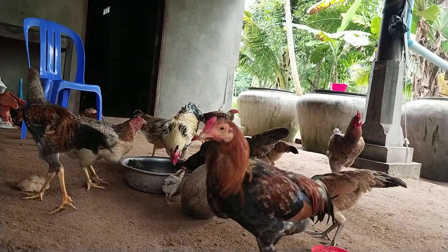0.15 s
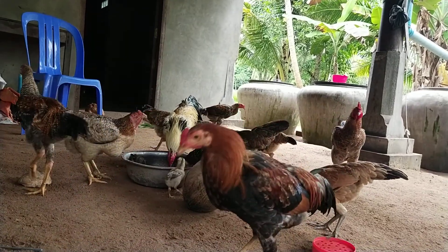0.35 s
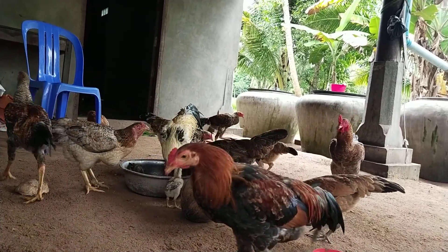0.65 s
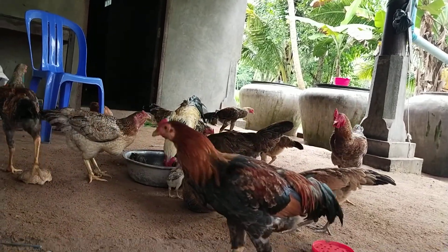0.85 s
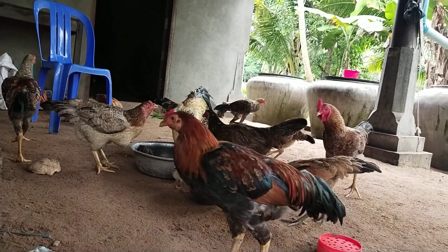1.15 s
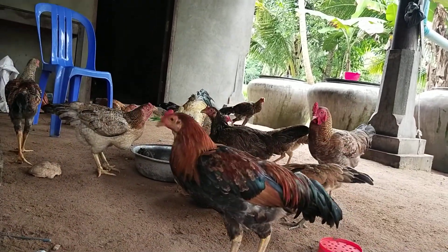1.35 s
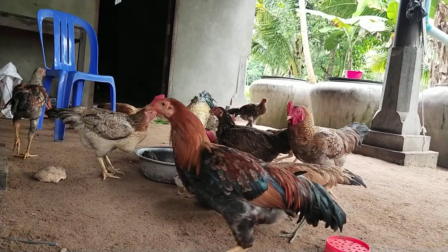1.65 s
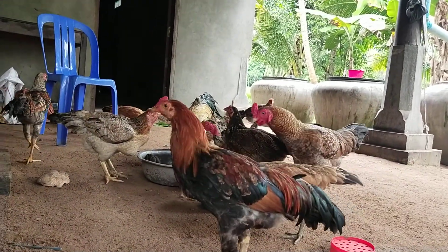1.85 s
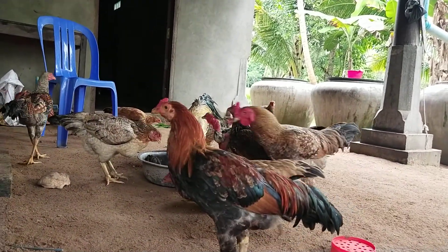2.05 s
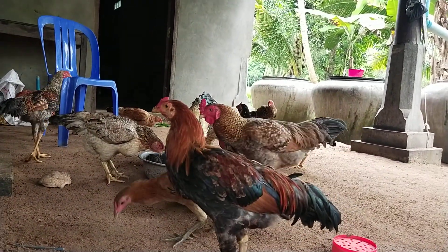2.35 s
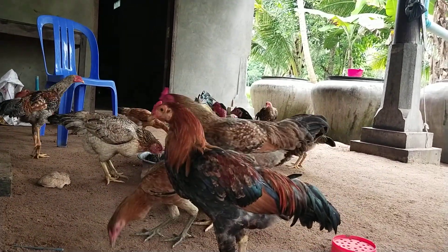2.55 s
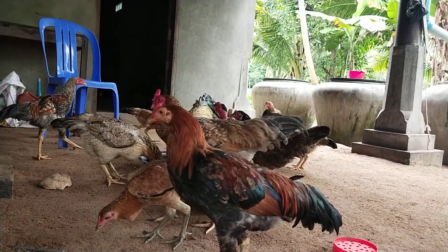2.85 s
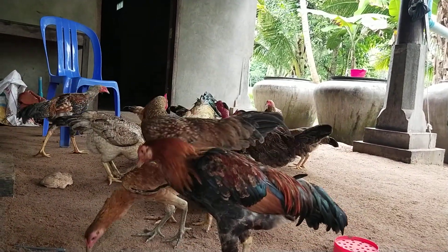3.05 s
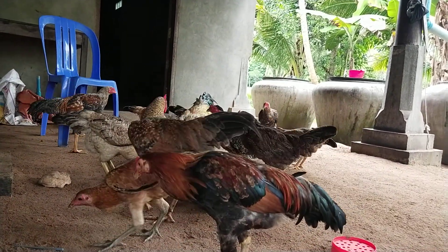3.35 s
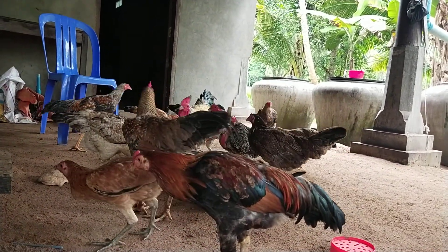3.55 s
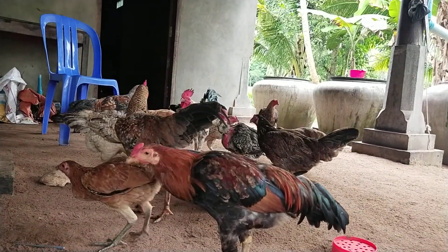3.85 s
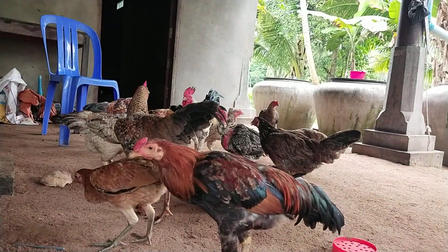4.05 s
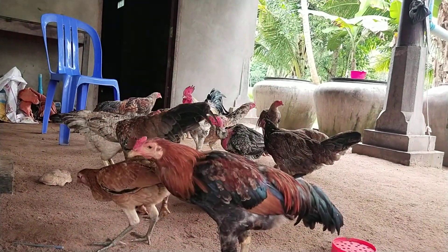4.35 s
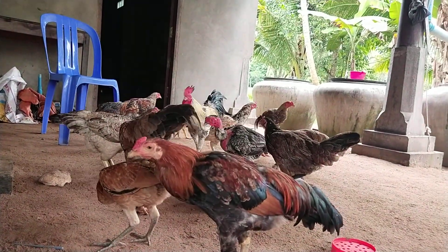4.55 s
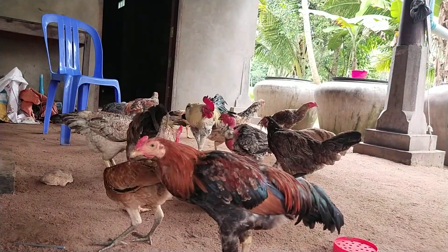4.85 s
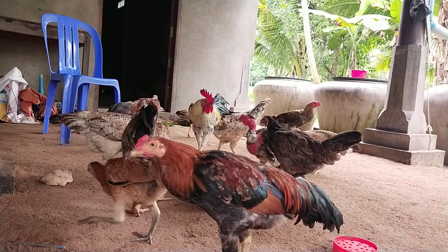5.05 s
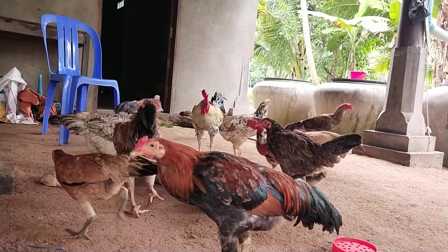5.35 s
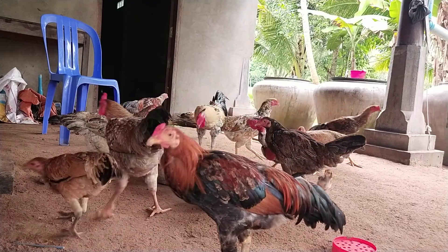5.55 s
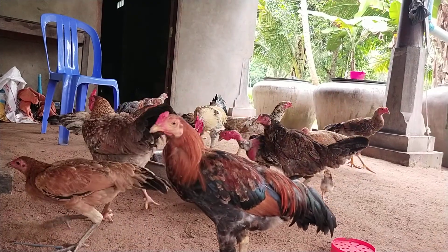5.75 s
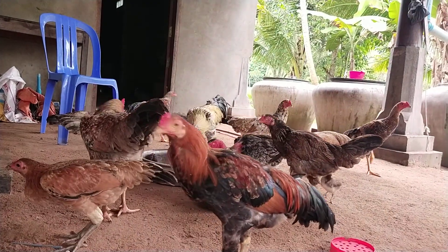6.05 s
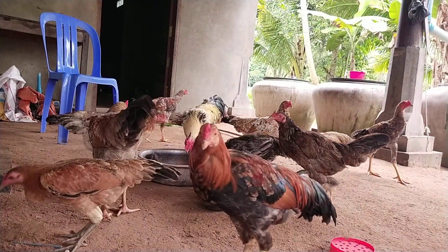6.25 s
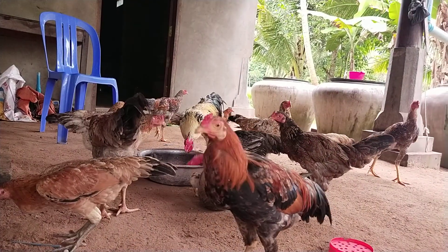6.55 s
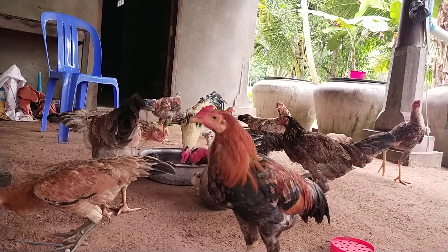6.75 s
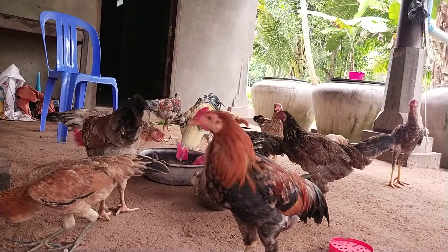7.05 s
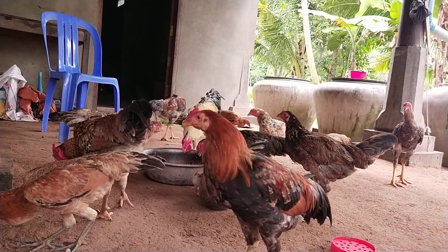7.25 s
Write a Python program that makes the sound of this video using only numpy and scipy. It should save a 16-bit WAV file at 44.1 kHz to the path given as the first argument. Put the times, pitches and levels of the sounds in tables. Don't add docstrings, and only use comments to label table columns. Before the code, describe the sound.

Hens cluck, coo and whistle softly around a metal feed basin while small chicks peep rapidly and beaks tap, in a hard-walled yard.

```python
import sys
import numpy as np
from scipy import signal
from scipy.fft import rfft, irfft, next_fast_len
from scipy.io import wavfile
from scipy.ndimage import uniform_filter1d

SR = 44100
rng = np.random.default_rng(int(sys.argv[2]) if len(sys.argv) > 2 else 0)


def makeup_ratio(level_db):
    decades = np.asarray(level_db, float) / 20
    return 10 ** decades


def waveform_to_disk(signal):
    frames = np.transpose(np.atleast_2d(signal))
    scaled = np.clip(frames, -1, 1) * 32767
    samples = np.round(scaled).astype(np.int16)
    wavfile.write(sys.argv[1], SR, samples)


N = 325899


def rms_one(x):
    return x / np.sqrt(np.mean(x ** 2) + 1e-20)


def band(x, low_hz, high_hz, order=2):
    return signal.sosfilt(signal.butter(order, [low_hz, high_hz], "band", fs=SR, output="sos"), x)


def drift(size, rate):
    knots = rng.standard_normal(max(300, int(size * 400 / SR) + 3))
    return np.interp(np.arange(size) * min(rate, 400) / SR, np.arange(len(knots)), knots)


def add(out, sound, start_s, pan_db):
    for side, sign in ((0, 1), (1, -1)):
        at = round(start_s * SR) + max(0, round(sign * pan_db * 1.5))
        part = sound[:N - at]
        out[side, at:at + len(part)] += makeup_ratio(sign * pan_db / 2) * part


def note(s, length, start_hz, end_hz, level_db, swell_db, arch=0):
    u = np.linspace(0, 1, num=9)
    pitch = start_hz + (end_hz - start_hz) * u + 4 * arch * start_hz * u * (1 - u)
    return np.c_[s + length * u, pitch, level_db + swell_db * u]


def sing(rows, partials_db, jitter, shimmer_db, edge_s):
    s, hz, level_db = np.transpose(rows)
    t = s[0] + np.arange(round((s[-1] - s[0]) * SR) + 400) / SR
    pitch = np.interp(t, s, hz) * (1 + jitter * drift(len(t), 257.8))
    phase = 2 * np.pi * np.cumsum(pitch) / SR
    wave = 0
    for k, db in enumerate(partials_db, 1):
        wave = wave + makeup_ratio(db + shimmer_db * drift(len(t), 110.0)) * np.sin(k * phase)
    edges = np.clip(np.minimum(t - t[0], t[-1] - t) / max(edge_s, 1e-3), 0, 1)
    return np.sqrt(2) * wave * makeup_ratio(np.interp(t, s, level_db)) * edges ** 2


def yard():
    # f/Hz, level per Hz/dB
    yard_colour = [(55, -9), (108, -2), (369, -20), (2300, -28), (3400, -26), (4700, -21), (5700, -31),
                   (6400, -16.5), (7300, -19.5), (8900, -20.5), (9700, -28), (10700, -19), (11600, -29),
                   (12200, -38), (13300, -41), (14600, -39)]
    size = next_fast_len(N)
    table_hz, table_db = np.transpose(yard_colour)
    hz = np.arange(1, size // 2 + 2) * SR / size
    alike = .95 / (1 + (hz / 1500) ** 1.4)
    colour = makeup_ratio(np.interp(np.log(hz), np.log(table_hz), table_db, left=-32, right=-44))
    colour = colour * np.sqrt([1 + alike, 1 - alike])
    mid, side = irfft(rfft(rng.standard_normal((2, size))) * colour, size)[:, :N]
    out, edges = 0, 25 * 2 ** np.arange(0, 9.5, .3)
    for low, high in zip(edges, edges[1:]):
        patches = makeup_ratio(2 * drift(N, 12) + 1.2 * drift(N, 3))
        out = out + patches * band([mid + side, mid - side], low, high)
    return makeup_ratio(-60) * rms_one(out)


def far_chicks():
    # t/s, start f/Hz, level/dB
    far_peeps = [(0.0, 7250, -87), (0.278, 7570, -69), (0.5, 7640, -62.5), (0.799, 7600, -64),
                 (1.102, 7610, -68), (1.31, 7420, -67.5), (1.448, 7600, -71), (2.43, 7440, -65),
                 (2.581, 7800, -65), (2.928, 7720, -66), (3.068, 7700, -67), (3.491, 7960, -65),
                 (3.768, 8190, -69.5), (4.049, 8040, -65), (4.308, 7960, -60.5), (4.529, 7010, -66.5),
                 (4.988, 7630, -72), (5.329, 7625, -65.5), (5.598, 7150, -64), (5.878, 7220, -70.5),
                 (6.18, 7330, -67), (6.358, 7730, -67), (6.529, 7520, -61), (6.628, 7430, -66.5),
                 (6.769, 6940, -62), (6.878, 7400, -67), (7.03, 7320, -70)]
    out = np.zeros((2, N))
    brood = rng.uniform((0, 3300, -87), (N / SR - .1, 4200, -76), (140, 3))
    brood[::2, 1] *= 2
    for s, start_hz, level_db in [*far_peeps, *brood]:
        rows = [(s, start_hz, level_db), (s + .095, start_hz * .85, level_db - 6.5)]
        add(out, sing(rows, [0], jitter=.015, shimmer_db=3, edge_s=.015), s, pan_db=-7)
    return out


def scuffles():
    # t/s, length/s, thump level/dB, feather hiss level/dB, lowest thump f/Hz
    bursts = [(0.556, 0.067, -62, -95, 120), (0.789, 0.32, -64, -101, 176), (0.976, 0.21, -62, -85, 180),
              (2.307, 0.121, -63.5, -77, 184), (3.032, 0.077, -63.5, -77, 300),
              (3.07, 0.063, -85, -69, 300), (3.41, 0.049, -57, -90, 397), (2.002, .3, -67.5, -92, 900),
              (4.75, 0.027, -63, -62.5, 300), (5.546, 0.13, -76, -76, 300), (5.307, 0.18, -58, -78, 1000),
              (5.535, 0.19, -62.5, -68, 700), (6.296, 0.12, -65, -73, 180)]
    out = np.zeros((2, N))
    for s, length, thump_db, hiss_db, low_hz in bursts:
        size = round(length * SR)
        lumps = makeup_ratio(5.5 * drift(SR // 3, 90))[:size]
        noise = rng.standard_normal((2, SR // 3))[:, :size] * lumps
        thump = makeup_ratio(thump_db) * rms_one(band(noise[0], low_hz, 2300 + 2 * low_hz))
        hiss = makeup_ratio(hiss_db) * rms_one(band(noise[1], 3300, 15000))
        add(out, (thump + hiss) * signal.windows.tukey(size, .3), s, pan_db=4.0)
    return out


def knocks(blows, bounce_s):
    contact_s, ring_hz, crack_db = .00068, 2600, -9
    out, t = np.zeros((2, N)), np.arange(400) / SR
    contact = t / contact_s * np.exp(1 - t / contact_s)
    crack = makeup_ratio(crack_db) * np.sin(2 * np.pi * ring_hz * t) * np.exp(-t / 0.00065)
    for s, peak_db, body_hz, bounce_hz, bounce_db in blows:
        body = contact * np.sin(2 * np.pi * body_hz * t)
        rebound = contact * np.sin(2 * np.pi * bounce_hz * t)
        add(out, makeup_ratio(peak_db) * (crack - body), s + .001, pan_db=3)
        add(out, makeup_ratio(peak_db + bounce_db) * rebound, s + bounce_s, pan_db=3)
    return out


def chicks():
    # t/s, length/s, start f/Hz, end f/Hz, level/dB
    fading_peeps = [(0.0, 0.035, 4020, 3160, -47), (.1, 0.11, 3320, 3170, -51),
                    (.29, 0.045, 3380, 2850, -46.5), (.77, 0.048, 4470, 3690, -46),
                    (.94, 0.1, 3100, 2640, -61), (1.19, 0.055, 3350, 2820, -49.5),
                    (1.56, 0.091, 4574, 3660, -50.5), (1.89, 0.18, 3700, 2800, -48.5),
                    (2.06, 0.049, 3700, 2810, -39), (2.11, 0.083, 5770, 4620, -46),
                    (2.7, 0.05, 4280, 3250, -42), (2.85, 0.035, 4380, 3630, -36),
                    (3.06, 0.039, 4180, 3450, -41.5), (3.17, 0.065, 6800, 5980, -48),
                    (3.49, 0.089, 3560, 2626, -45.5), (3.63, 0.046, 4100, 3300, -40),
                    (3.76, .04, 4420, 3980, -49), (4.03, 0.045, 4150, 3860, -56),
                    (2.28, 0.038, 4120, 3510, -45), (4.31, 0.031, 4120, 3640, -40.5),
                    (4.37, 0.053, 2650, 2940, -47), (4.98, 0.05, 4150, 3160, -39.5),
                    (5.59, 0.098, 3480, 3150, -42), (5.84, 0.046, 2685, 3150, -46)]
    held_peeps = [(1.265, 0.056, 4250, 4020, -55.5), (1.3, 0.067, 3900, 2800, -53.5),
                  (1.3, 0.11, 4770, 4450, -52.5), (2.27, 0.047, 5930, 4820, -48.5),
                  (2.31, 0.16, 7340, 7110, -55.5), (3.13, 0.12, 3620, 2786, -53),
                  (3.33, 0.25, 7070, 7020, -58), (3.8, 0.026, 4560, 3470, -49.5),
                  (4.36, 0.074, 5340, 5580, -62.5), (1.7, 0.028, 3120, 2710, -50.5),
                  (2.43, 0.034, 6600, 6150, -54), (4.52, 0.065, 3590, 2720, -50),
                  (4.84, 0.028, 4000, 3270, -52), (4.865, 0.044, 3230, 2760, -49),
                  (5.83, 0.071, 4300, 3490, -63), (6.15, 0.047, 3810, 2980, -53),
                  (6.86, 0.066, 3220, 3520, -54.5), (6.98, 0.063, 3435, 3207, -50),
                  (7.02, 0.031, 5000, 4150, -54), (6.48, 0.061, 4800, 5760, -57),
                  (7.02, 0.064, 3070, 2570, -60), (7.28, 0.087, 4300, 3310, -60)]
    drooping_peeps = [(1.43, 0.067, 4030, 3980, -50.5), (1.5, 0.018, 3990, 2570, -41),
                      (6.75, 0.097, 3385, 2730, -50), (1.5, 0.069, 5370, 4910, -50),
                      (2.08, 0.15, 3880, 2780, -50), (5.19, 0.055, 4300, 4400, -49.5)]
    hooked_peeps = [(.69, 0.048, 4560, 4530, -49), (4.49, 0.035, 3000, 3470, -60)]
    # t/s, f/Hz, level/dB
    bent_peeps = [
        [(1.632, 5010, -59), (1.65, 5660, -45), (1.69, 5290, -42), (1.715, 4340, -46)],
        [(4.095, 5480, -57), (4.14, 5380, -48.5), (4.2, 4590, -46), (4.235, 4310, -41), (4.262, 2985, -45.5),
         (4.295, 2530, -52.5)],
        [(4.12, 4523, -47), (4.145, 4330, -43.5), (4.16, 3600, -45), (4.19, 3350, -56)],
        [(.475, 3600, -43), (.5, 3186, -59), (.55, 2870, -71), (.62, 2900, -52)],
        [(.53, 4350, -56), (.555, 4420, -54), (.58, 3980, -50), (.605, 3540, -50)],
        [(3.22, 5560, -60), (3.26, 5370, -49), (3.295, 5000, -47), (3.32, 4240, -49)],
        [(3.33, 4150, -48), (3.365, 3740, -50.5), (3.38, 3300, -53), (3.42, 2870, -56)],
        [(3.465, 5630, -49), (3.49, 5880, -46), (3.53, 5260, -41), (3.545, 4070, -44)],
        [(5.265, 4100, -45.5), (5.36, 3886, -44.5), (5.385, 3350, -44), (5.44, 3260, -52), (5.51, 3080, -57)],
        [(5.475, 4710, -48), (5.49, 5477, -46), (5.52, 5620, -45), (5.548, 4940, -32), (5.56, 4000, -47),
         (5.58, 3000, -47), (5.6, 2810, -54)],
        [(6.165, 5190, -42), (6.21, 4630, -44.5), (6.27, 4510, -45), (6.34, 4390, -43.5), (6.37, 3700, -46.5),
         (6.405, 2510, -46.5)],
        [(6.47, 2580, -48.5), (6.515, 3620, -48.5), (6.53, 4300, -43)],
        [(2.325, 3500, -43), (2.37, 3784, -50), (2.43, 3640, -47.5), (2.46, 2870, -51.5)],
        [(6.57, 5800, -33), (6.605, 4620, -38), (6.63, 3780, -43), (6.665, 2650, -44)],
    ]
    # t/s, f/Hz, level/dB
    swelling_peeps = [
        [(1.05, 3400, -62), (1.085, 3020, -43.5), (1.134, 2774, -46)],
        [(4.65, 4170, -56), (4.7, 3995, -45), (4.726, 3320, -49), (4.765, 2730, -53)],
        [(6.62, 7830, -50), (6.645, 6300, -45), (6.665, 5300, -52)],
        [(6.36, 7400, -54), (6.39, 5300, -55)],
    ]
    kinds = [(fading_peeps, -11.5, -0.018), (held_peeps, 3.8, 0.0106),
             (drooping_peeps, 3.2, .08), (hooked_peeps, -2.2, 0.17)]
    peeps = [note(*row, swell_db, arch) for kind, swell_db, arch in kinds for row in kind]
    out, octave_db = np.zeros((2, N)), -23.5
    for rows in peeps + bent_peeps + swelling_peeps:
        peep = sing(rows, [0, octave_db], jitter=.007, shimmer_db=2, edge_s=.011)
        add(out, peep, rows[0][0], pan_db=rng.normal(1, 2))
    return makeup_ratio(-2.5) * out


def hens():
    # t/s, length/s, start f/Hz, end f/Hz, fundamental level/dB
    murmurs = [(.82, 0.24, 475.4, 467, -59), (5.82, 0.052, 204, 223.3, -56),
               (5.96, 0.1405, 203.2, 215.7, -61.5), (6.96, 0.084, 442, 426, -80)]
    coos = [(.26, 0.082, 262.7, 262.7, -47), (1.1, 0.085, 528.4, 517.7, -42.5),
            (2.78, 0.11, 361.8, 298.5, -62.5), (6.32, 0.068, 520, 529, -48)]
    clucks = [(2.23, 0.0725, 477, 445.7, -50), (3.04, 0.042, 334.4, 384, -56),
              (3.412, 0.0474, 345.6, 378.6, -48)]
    buks = [(3.805, 0.059, 272.4, 223, -65.5), (4.09, 0.047, 323, 226, -67.5),
            (5.538, 0.026, 304, 286, -55.5), (6.915, 0.054, 346, 268.7, -54)]
    squawks = [(1.385, 0.047, 303.6, 270, -60), (1.445, 0.022, 310, 302, -56),
               (1.418, 0.035, 329.3, 314, -48.5), (2.38, 0.021, 334, 317.4, -54.5)]
    moans = [(0.0, 0.013, 436, 401, -58.5), (1.05, 0.12, 453, 437.7, -52.5), (1.99, 0.156, 450, 464, -55.5),
             (2.35, 0.087, 515.7, 549, -50)]
    pullet = [(3.335, 0.065, 554, 517, -54), (4.625, 0.073, 588.9, 523.4, -56),
              (5.975, 0.056, 570, 521, -55), (6.26, 0.049, 557, 565, -63), (7.2, 0.064, 550, 525, -59)]
    hums = [(.56, 0.0735, 310, 250, -53.5), (3.7, .26, 590, 720, -63.5), (6.08, 0.24, 380, 620, -63),
            (2.0, 0.13, 680, 530, -59.5)]
    # left-right/dB, swell over a note/dB, partials 2, 3, 4, 5 and above/dB
    voices = [(murmurs, 5.9, 3, (-5.5, 1, -13, -20.5)), (coos, 3, -9, (-12, -11, -18.5, -14.5)),
              (clucks, 4.3, -8, (1.5, -1.5, -2, 0)), (buks, 2.6, -8, (14, 3.5, 1, -4)),
              (squawks, 6, -18, (15.9, 15, 20.4, 8.2)), (moans, 8.5, -4.5, (6, -0.5, -24, -34)),
              (pullet, 4.9, 5, (-7.5, -2, -4.5, -25.5)), (hums, 4.3, -0.64, (-14, -13, -18, -42))]
    # t/s, f/Hz, level/dB
    whistles = [
        [(0.635, 1205, -48), (0.685, 1114, -47)],
        [(0.89, 1556, -50), (0.95, 1528, -43), (.975, 1295, -43), (1.0, 906, -46.5), (1.035, 540, -46.5)],
        [(1.3, 1718, -50), (1.325, 1547, -44), (1.35, 1230, -41.5), (1.365, 1224, -38.5), (1.388, 1224, -33.5),
         (1.41, 1205, -47), (1.47, 1250, -54), (1.56, 1230, -75)],
        [(1.98, 1473, -45.5), (2.0, 1224, -50), (2.06, 1091, -38), (2.15, 1058, -38.5), (2.22, 1165, -36),
         (2.33, 1060, -46), (2.47, 1016, -65), (2.63, 982, -69.5)],
        [(3.022, 1273, -53), (3.045, 1260, -49), (3.067, 1120, -37.5), (3.08, 1111, -37), (3.1, 1048, -40.5)],
        [(4.3, 1156, -47), (4.37, 1139, -46.5), (4.385, 1010, -42.5), (4.435, 979, -39.5), (4.47, 980, -60),
         (4.487, 1065, -35), (4.515, 1122, -44), (4.535, 1154, -60)],
        [(5.7, 1237, -62), (5.722, 1230, -41.5), (5.74, 1220, -61)],
        [(6.72, 1184, -44.5), (6.76, 1139, -43.5)],
    ]
    # left-right/dB, octave level/dB
    whistlers = [(-3, -25), (3.5, -33.5), (-2.5, -36), (3.5, -16.5), (6.5, -42), (9, -27.5), (-6, -34),
                 (9, -12)]
    # t/s, f/Hz, fundamental level/dB
    swells = [
        [(.686, 820, -33), (.697, 635, -36.5), (.73, 604, -39), (.75, 603, -54)],
        [(.845, 254, -65), (.865, 249, -57.5), (.895, 237, -58.5)],
        [(.955, 263.6, -58), (.98, 256.9, -56.5), (1.03, 245.7, -58), (1.045, 242, -74)],
        [(4.756, 243.3, -51.5), (4.78, 242.2, -42), (4.8, 236, -53.5)],
        [(4.972, 227.5, -57.5), (5.0, 219.7, -48.5), (5.008, 218.3, -46), (5.02, 216.8, -58), (5.06, 213, -60)],
        [(5.185, 212.4, -58), (5.205, 226.2, -49), (5.225, 226, -55.5), (5.25, 227.1, -53.5),
         (5.29, 229, -58.5)],
        [(5.647, 313, -57.5), (5.665, 314, -57), (5.68, 305.6, -54), (5.7, 300, -71)],
        [(6.76, 658, -40), (6.772, 629, -38), (6.797, 610.4, -40.5), (6.829, 587, -38.5), (6.84, 568, -46)],
    ]
    # left-right/dB, (partials 2, 3, ..)/dB
    throats = [(3.5, (-2.5, -15.5, -20, -23)), (4, (6, -7, -8, -8, -10)),
               (4, (9.5, 0, -3, -3, -7, -4, -4, -4, 5.5, -13, -30)),
               (4.3, (4, 0, -9.5, -20, -9, -4, -12, 1.5, -3.5, -11)),
               (4.3, (4, -1.5, 1, -8, 6, -5, 2, -4, -7, -6, -6)),
               (4.3, (4, -1.5, 6.5, -3.5, -11.5, -16, -11, -17)), (4.4, (13.5, 9.5, 20.5, -16, 7, -6, 5.5)),
               (6, (-3, -1, -3.5, -12, -19, -21, -29))]
    notes = []
    for table, pan_db, swell_db, partials_db in voices:
        for row in table:
            notes.append((note(*row, swell_db, arch=-0.012), pan_db, partials_db))
    for rows, (pan_db, octave_db) in zip(whistles, whistlers):
        notes.append((rows, pan_db, (octave_db, -37, -31.5, -41)))
    notes += [(rows, *throat) for rows, throat in zip(swells, throats)]
    out = np.zeros((2, N))
    for rows, pan_db, partials_db in notes:
        start_s, start_hz = rows[0][0], rows[0][1]
        upper = np.arange(1, max(1, 4700 // start_hz - len(partials_db)))
        strain = np.clip((partials_db[0] + 1) / 16, 0, 1)
        waver = 10 / start_hz
        all_db = [0, *partials_db, *(partials_db[-1] - 2 * upper)]
        call = sing(rows, all_db, jitter=waver + .045 * strain, shimmer_db=95 * waver + strain, edge_s=.007)
        add(out, call, start_s, pan_db)
    return out


def walls(x, t60_s=0.32, early_t60_s=0.045, late_db=-10, slap_s=0.0055, slap_db=-18, cut_hz=7000, apart_db=-2):
    t = np.arange(SR // 2) / SR
    rise = np.clip((t - .003) / 0.0087, 0, 1)
    decay = makeup_ratio(-60 * t / early_t60_s) + makeup_ratio(late_db - 60 * t / t60_s)
    spectra = rfft(rng.standard_normal((2, len(t))) * decay * rise)
    even = irfft(spectra / np.sqrt(uniform_filter1d(np.abs(spectra) ** 2, size=50, axis=1)))
    shared, apart = even * np.sqrt(rise) * (t < .4)
    tail = rms_one(shared + makeup_ratio(apart_db) * apart * [[1], [-1]]) / np.sqrt(len(t))
    tail[:, round(slap_s * SR)] += makeup_ratio(slap_db)
    tail = band(tail, 464, cut_hz, order=1)
    return signal.fftconvolve(x.mean(axis=0, keepdims=True), tail, axes=1)[:, :N]


def ports(x):
    mid, side = (x[0] + x[1]) / 2, (x[0] - x[1]) / 2
    side = side - signal.sosfilt(signal.butter(1, 450, fs=SR, output="sos"), side)
    return np.array([mid + side, mid - side])


def scene():
    # t/s, peak level/dB, body f/Hz, rebound f/Hz, rebound level/dB
    basin_blows = [(0.619, -32.5, 910, 2070, 0), (1.7445, -36.5, 890, 2050, 0.5),
                   (2.6365, -37, 960, 1990, -0.5), (3.172, -33, 1350, 1570, -6.5),
                   (6.675, -36, 670, 2170, -5.5)]
    # t/s, peak level/dB, body
    # f/Hz, slap f/Hz, slap level/dB
    light_blows = [(2.7555, -37, 1000, 800, -1.5), (1.924, -64, 500, 900, -11), (2.4, -34, 1200, 1200, -6)]
    far, feet, near, adults = far_chicks(), scuffles(), chicks(), hens()
    taps, pecks = knocks(basin_blows, bounce_s=0.0105), knocks(light_blows, bounce_s=.007)
    direct = adults + makeup_ratio(-3.5) * near + makeup_ratio(-4) * far + makeup_ratio(7) * taps + feet + pecks
    sent = makeup_ratio(-0.5) * adults + makeup_ratio(0.9) * near + makeup_ratio(16.0) * far + makeup_ratio(11) * taps + makeup_ratio(14.5) * feet
    return ports(direct + walls(sent) * makeup_ratio([[.6], [-.6]])) + yard()


def gate(x, floor_db=-102, depth_db=-45, unrest_db=2.6):
    # f/Hz, level/dB
    shut_below = [(1900, -9.5), (3500, -7), (5500, -5), (7500, -5.5), (9500, -3.5), (11300, -3),
                  (12500, .3), (15500, .3)]
    lead, width, top_hz = 377, 8, 10760
    hz, _, spectra = signal.stft(np.pad(x, ((0, 0), (lead, 0))), SR, nperseg=2048)
    power = np.mean(np.abs(spectra[:, 1:]) ** 2, axis=0)
    power = uniform_filter1d(power, size=2, axis=1) + 1e-18
    power = power.reshape(-1, width, power.shape[1]).mean(axis=1)
    centre_hz = hz[width // 2::width]
    around_db = uniform_filter1d(10 * np.log10(power), size=13, axis=0)
    around_db += unrest_db * rms_one(uniform_filter1d(rng.standard_normal(power.shape), size=3, axis=1))
    threshold_db = around_db + np.interp(centre_hz, *np.transpose(shut_below))[:, None]
    below_top = centre_hz < top_hz
    threshold_db[below_top] = np.maximum(floor_db, threshold_db[below_top])
    shut = np.clip(threshold_db - 10 * np.log10(power), 0, 1) * (centre_hz > 1900)[:, None]
    spectra[1, hz > top_hz] *= makeup_ratio(-7)
    spectra[:, 1:] *= makeup_ratio(depth_db * np.repeat(shut, width, axis=0))
    return signal.istft(spectra, SR, nperseg=2048)[1][:, lead:lead + N]


def top_cut(x):
    return signal.sosfilt(signal.butter(12, 15520, fs=SR, output="sos"), x)


def record(dry):
    return top_cut(gate(dry))


dry = scene()
out = record(dry)
waveform_to_disk(out)
```